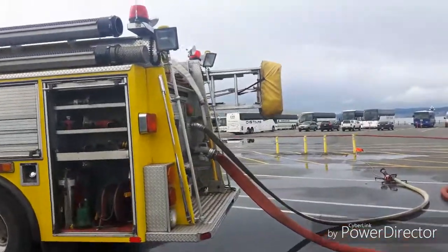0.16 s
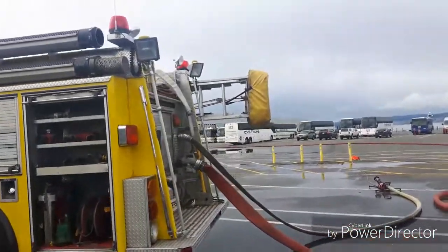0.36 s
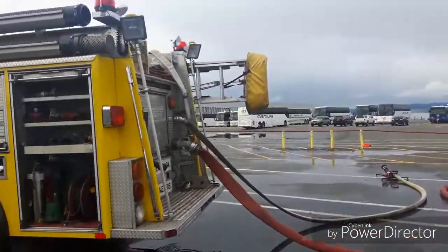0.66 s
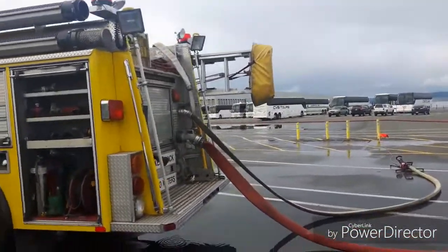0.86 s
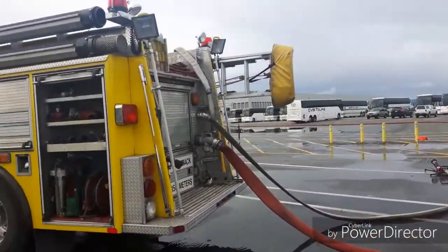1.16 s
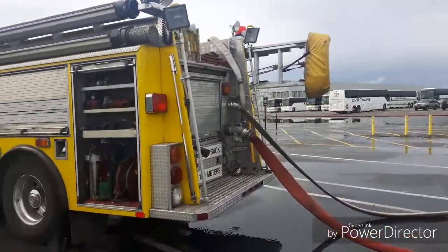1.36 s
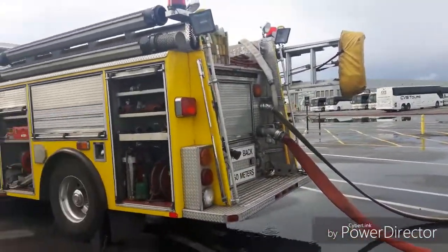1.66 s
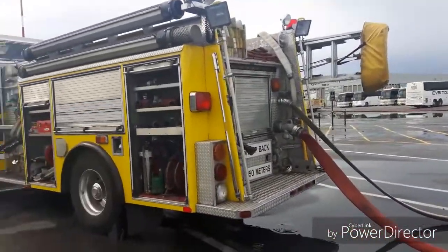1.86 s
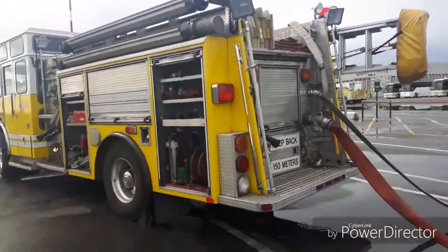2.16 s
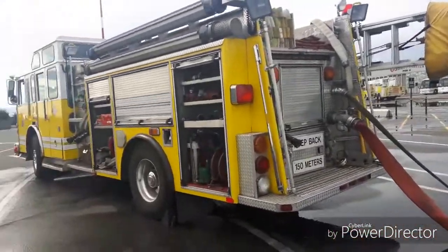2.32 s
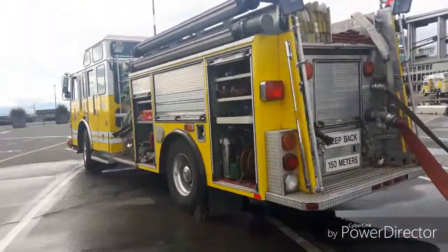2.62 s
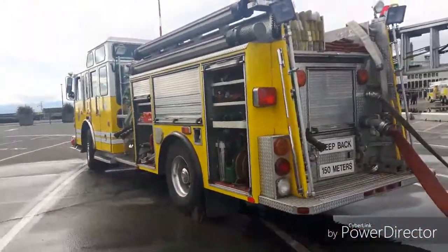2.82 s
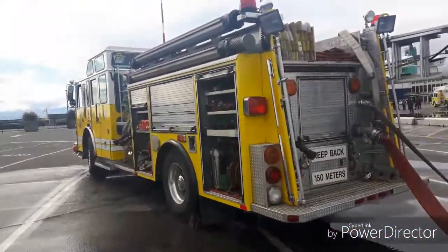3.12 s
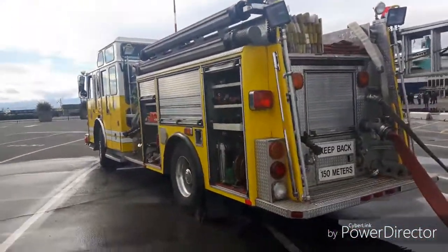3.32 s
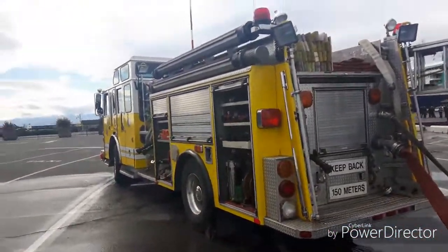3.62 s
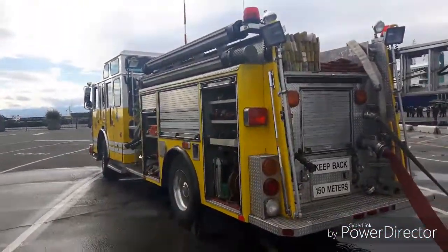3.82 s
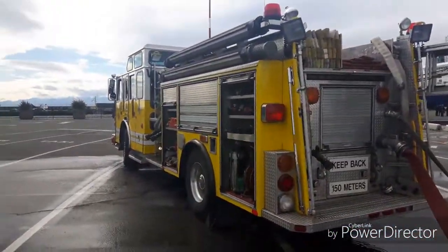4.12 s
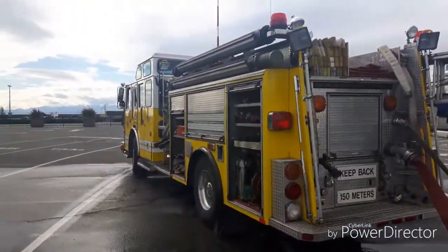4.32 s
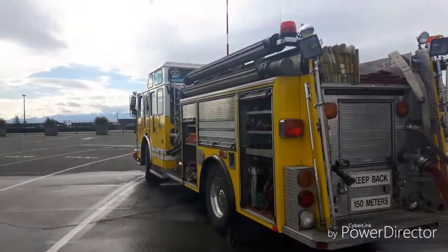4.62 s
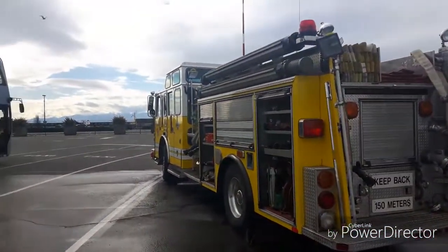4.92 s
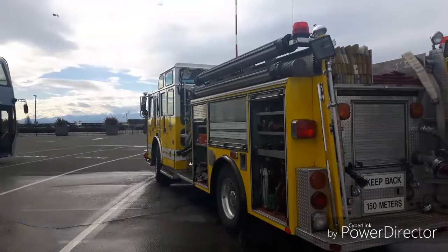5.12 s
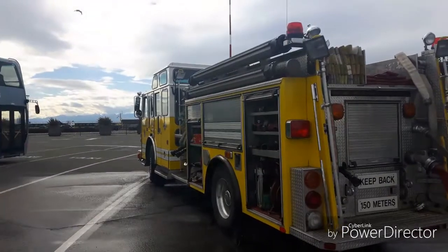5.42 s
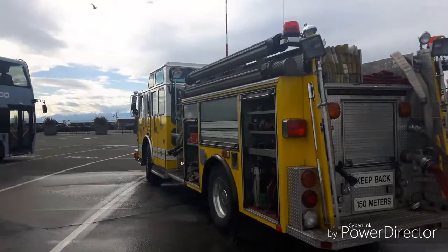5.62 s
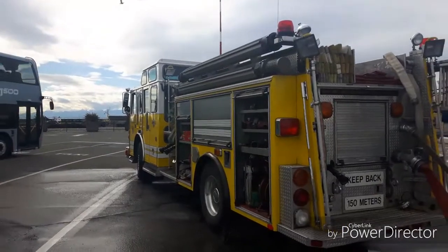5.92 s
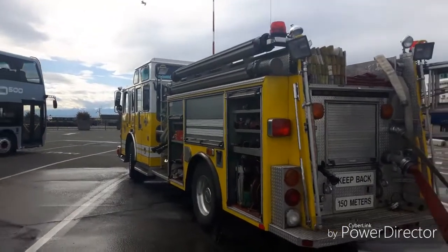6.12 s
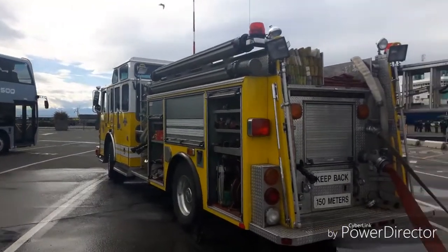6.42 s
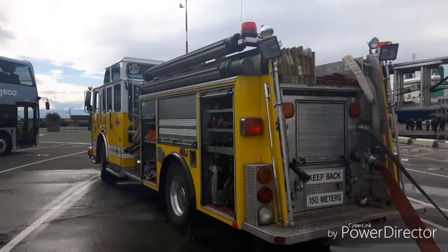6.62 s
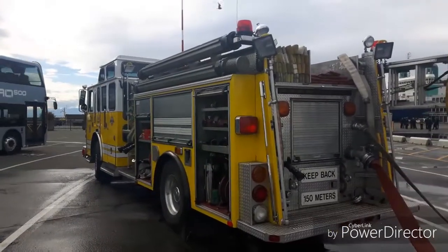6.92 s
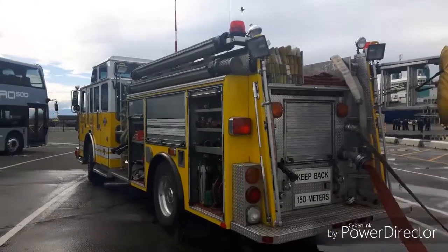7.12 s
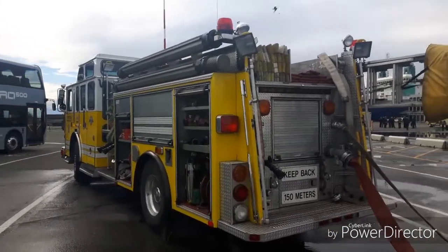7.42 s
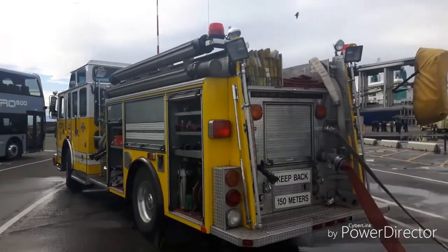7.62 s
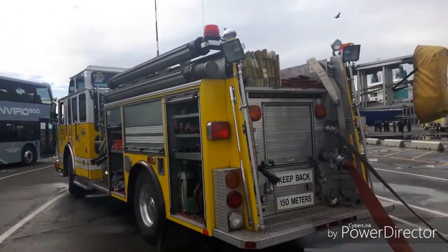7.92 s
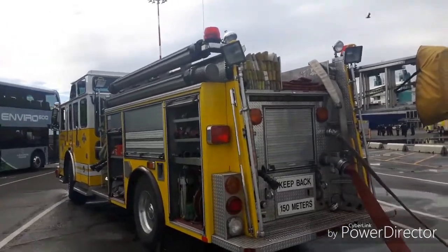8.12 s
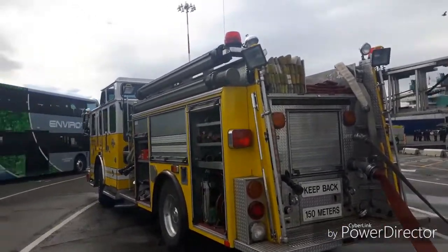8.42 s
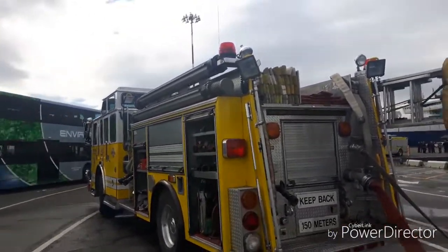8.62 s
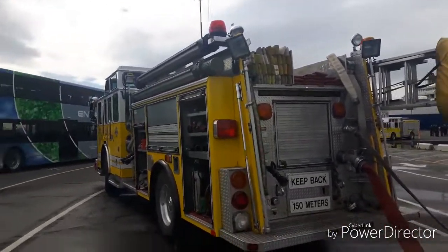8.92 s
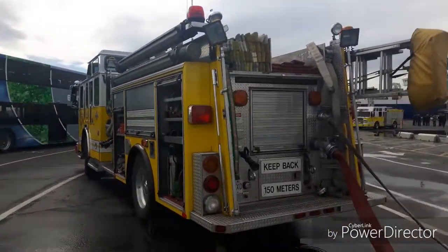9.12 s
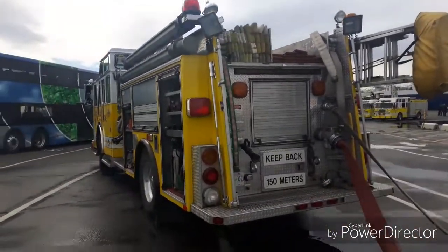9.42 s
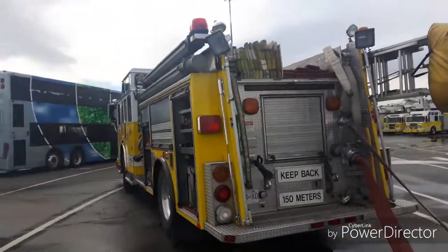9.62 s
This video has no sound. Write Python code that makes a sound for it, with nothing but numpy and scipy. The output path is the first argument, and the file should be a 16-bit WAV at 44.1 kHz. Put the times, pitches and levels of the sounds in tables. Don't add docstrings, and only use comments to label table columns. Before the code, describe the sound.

From 0 s a large six-cylinder diesel runs close by in an open yard, driving a pump: a thick low roar with rapid firing pulses, exhaust hum and mid-pitched gear tones. Its speed wavers only slightly, and individual tones swell and fade as the handheld microphone walks around the tail. Fine air and water hiss and a very faint high turbo whistle lie above. Around 1.5-2.5 s the clatter dulls, then opens brighter by 3.5 s. From 3 to 7 s come tiny gritty ticks, loose rattles and wet steps, with the sharpest click and splash near 4.1 s. A creeping bus adds a faint gear note from about 2.5 to 8.5 s, rising late. After 5 s the watery spray fades and the upper sound changes colour. From 9 s wind slaps and low pops buffet the microphone, strongest near 9.6 s, while the engine speeds up slightly until the end at about 9.8 s.

```python
import sys
import numpy as np
from scipy import signal
from scipy.fft import rfft, irfft
from scipy.io import wavfile
from scipy.ndimage import uniform_filter1d

SR = 44100
rng = np.random.default_rng(int(sys.argv[2]) if len(sys.argv) > 2 else 0)


def pcm_store(signal):
    levels = np.round(np.clip(np.atleast_2d(signal), -1, 1) * 32767)
    wavfile.write(sys.argv[1], SR, levels.astype(np.int16).T)


def to_linear_factor(level_db):
    exponent = np.asarray(level_db, float) / 20
    return 10 ** exponent


N = 430416
TIME = np.arange(N) / SR
HZ = np.maximum(np.fft.rfftfreq(N, 1 / SR), 1)
COARSE = 10


def in_time(rows, t=TIME):
    s, *columns = np.transpose(rows)
    return [np.interp(t, s, column) for column in columns]


def at_hz(points, hz):
    point_hz, value = np.array(points)[:, 0], np.array(points)[:, 1]
    return np.interp(np.log(hz), np.log(point_hz), value)


def swell(s, half_s, t=TIME):
    return np.exp(-((t - s) / half_s) ** 2)


def rounded(x, seconds, t=TIME):
    return uniform_filter1d(x, size=round(seconds / t[1]), mode="nearest")


def drift(rate, t=TIME):
    knots = rng.standard_normal(1000)
    return np.interp(t * rate * 2, np.arange(1000), 1.2 * knots)


def coloured(spectrum):
    x = irfft(rfft(rng.standard_normal(N)) * to_linear_factor(at_hz(spectrum, HZ)), N)
    return x / x.std()


def filtered(x, order, hz, kind):
    return signal.sosfilt(signal.butter(order, hz, kind, fs=SR, output="sos"), x)


def resonance(x, hz, width_hz):
    r = np.exp(-np.pi * width_hz / SR)
    poles = [1, -2 * r * np.cos(2 * np.pi * hz / SR), r * r]
    return signal.lfilter([(1 - r * r) / 2, 0, (r * r - 1) / 2], poles, x)


def noise_band(hz, width_hz):
    band = resonance(resonance(rng.standard_normal(N), hz, width_hz), hz, width_hz)
    return band / band.std()


def tone(angle, level_db, fade_db, t, rate):
    wander = .5 * fade_db / 4 * drift(rate, t)
    level = np.sqrt(2) * to_linear_factor(level_db + fade_db * drift(rate, t))
    return level * np.sin(angle + wander + rng.uniform(0, 7.02))


def spot_gains(spots, who, t):
    return [to_linear_factor(db) * swell(s, half_s, t) for name, s, half_s, db in spots if name == who]


# time in seconds, pitch in Hz, level in dB rms.
BUS_NOTE = [(2.3, 548, -62), (2.7, 555, -42), (3.3, 559, -42), (3.95, 561, -46), (4.2, 561, -57),
            (4.8, 556, -50), (6.2, 560, -48), (6.7, 566, -60), (7.7, 586, -56), (8, 592, -47),
            (8.4, 606, -50), (8.7, 612, -62)]


def bus():
    hz, db = in_time(BUS_NOTE)
    gear = tone(2 * np.pi * np.cumsum(hz) / SR, db, 1.7, TIME, 5.0)
    fan = to_linear_factor(-50) * swell(9.4, .55) * noise_band(2640, 400)
    return gear + fan


# time in seconds, half-length in seconds, level in dB rms.
GUSTS = [
    (0.502, 0.75, -42.5),
    (2, 1.2, -46),
    (3.153, 0.6, -39.5),
    (7.6, 1.5, -50.5),
    (9.005, 0.028, -32),
    (9.2, .2, -37),
    (9.4, 0.13, -35),
    (9.65, 0.07, -33),
    (9.744, .04, -37),
]
# time in seconds, peak in dB, sharpness as a share of the hump.
POPS = [(9.1164, -10.5, .35), (9.1258, -8.5, .2), (9.1336, -13, .6), (9.3335, -12.5, .1), (9.369, -14, .3),
        (9.379, -16, .3), (9.3925, -13, .4), (9.4115, -14, .2), (9.592, -5, .5), (9.616, -16, .2),
        (9.632, -15.5, .1), (9.644, -18, 0), (9.66, -18, .1), (9.7395, -14.5, 0)]


def wind():
    calm_db = -56
    blow = to_linear_factor(calm_db) + sum(to_linear_factor(db) * swell(s, half_s) for s, half_s, db in GUSTS)
    lumps = blow * to_linear_factor(2.5 * drift(20))
    lumps = lumps * coloured([(20, -39.5), (60, -2.0), (120, -3.0), (220, -11.0), (500, -33.0), (2000, -82.0)])

    kicks = np.zeros((2, N))
    for s, db, sharp in POPS:
        kicks[:, round(s * SR)] = to_linear_factor(db), sharp * to_linear_factor(db)
    t = np.arange(-200, 1200) / SR
    swing = np.cos(2 * np.pi * 152 * t) * np.exp(-np.where(t < 0, -t / .0032, t / .006))
    edge = np.cos(2 * np.pi * 290 * t) * np.exp(-(t / .0014) ** 2)
    pops = signal.oaconvolve(kicks, [.66 * swing, edge], axes=1).sum(0)

    port = signal.butter(2, [40, 1300], "band", fs=SR, output="sos")
    return signal.sosfiltfilt(port, lumps + 1.05 * pops[150:N + 150])


# time in seconds, peak in dB, pitch in
# Hz.
GRIT = [(3.336, -28, 2000), (3.401, -26, 2000), (3.489, -28, 1900), (3.541, -25.5, 1600), (3.66, -29, 1900),
        (3.829, -30, 1500), (4.051, -27, 1500), (4.083, -17.5, 1500), (4.095, -25, 1400),
        (4.108, -27, 1500), (4.135, -28, 2600), (4.160, -24.5, 1450), (4.178, -29, 2800),
        (4.364, -30, 1700), (4.659, -25, 3000), (4.756, -28, 2000), (5.008, -23.5, 2800), (5.33, -29, 3200),
        (5.385, -30, 3200), (5.534, -24.5, 3300), (5.605, -29, 3200), (5.676, -29, 3000),
        (5.846, -33, 3400), (6.120, -24, 3200), (6.291, -29, 3300), (6.808, -28, 3300),
        (3.224, -32, 1400), (3.2996, -31, 1400), (3.375, -30, 1900), (3.505, -29, 2000),
          (3.619, -33, 1300), (3.7805, -29, 1300), (3.803, -30, 1250), (4.035, -32, 1300),
          (4.12, -30, 1400), (4.6345, -34, 3040), (4.891, -35, 3120), (5.179, -34, 2860),
          (5.342, -31, 3200), (5.3635, -35, 3500), (5.593, -31, 3500), (5.634, -33, 3360),
          (5.81, -34, 3040), (5.918, -34, 3160), (6.022, -34, 3380), (6.04, -34, 3100), (6.078, -33, 3200),
          (6.155, -32, 3100), (6.346, -34, 3400), (6.385, -35, 3400), (6.613, -33, 3300), (6.70, -33, 3100),
          (6.938, -34, 3400), (7.013, -34, 3270)]
# time in seconds, peak in dB.
CRACKLES = [(0.1062, -62), (0.201, -63), (0.2968, -55), (0.668, -55), (0.8974, -61.5), (1.4587, -59.5),
            (2.795, -58.5), (2.8423, -55.5), (3.019, -59), (4.039, -57.5), (5.146, -57), (6.66, -65),
            (6.7835, -59.5), (6.838, -63), (7.193, -62), (7.752, -59), (7.8785, -61.5), (8.284, -58.5),
            (9.161, -57), (9.4336, -61.5)]


def ticks():
    out, t = np.zeros(N + 1500), np.arange(1500) / SR
    for s, db, hz in GRIT:
        burst = rng.standard_normal(1500) * np.exp(-t / 0.0041)
        ring = filtered(burst, 4, [.76 * hz, min(1.4 * hz, 3900)], "band")
        out[round(s * SR):][:1500] += to_linear_factor(db - 0.5) * ring / abs(ring).max()
    for s, db in CRACKLES:
        burst = rng.standard_normal(300) * np.exp(-t[:300] / .0012)
        burst = np.diff(burst, 2)
        out[round(s * SR):][:298] += to_linear_factor(db + 4.0) * burst / abs(burst).max()
    return out[:N]


# time in seconds, half-length in seconds, level in dB rms.
STEPS = [
    (2.9, 0.15, -48),
    (3.45, 0.14, -45),
    (4.103, 0.15, -42),
    (4.731, .05, -50),
    (6.066, 0.05, -52),
    (6.828, .04, -43),
]


def stirred():
    return sum(to_linear_factor(db) * swell(s, half_s) for s, half_s, db in STEPS)


def splashes():
    drops_per_s = 1100
    falls = rng.random(N) < drops_per_s / SR
    size = to_linear_factor(3.8 * rng.exponential(1, N).clip(0, 5))
    drops = falls * size * rng.choice([-1, 1], N)
    drops = filtered(drops, 2, (1220, 3730), "band")
    drops = filtered(drops, 8, 4200, "low")
    return stirred() * drops / drops.std()


# frequency in Hz, density in dB per Hz.
SPRAY_COLOUR = [(3500, -11), (4600, 2), (5500, 0), (6300, -3.5), (7000, -17), (8000, -51)]


def spray():
    base_db, sight_db, gone_s, fade_s, stirred_db = -81.5, 11.5, 5.3, .2, -30.5
    sight = in_time(WALK)[0]
    level = to_linear_factor(base_db + sight_db * sight) + to_linear_factor(stirred_db) * stirred()
    level = level / (1 + np.exp((TIME - gone_s) / fade_s))
    return level * to_linear_factor(1.2 * drift(17)) * coloured(SPRAY_COLOUR)


# frequency in Hz, density in dB per Hz.
AIR_COLOUR = [(4000, -5.5), (6800, -1.5), (7900, -2.5), (8300, -4.5), (8800, -4), (11000, -5.5),
              (13000, -3.5), (15400, -2)]


def air_hiss():
    base_db, hidden_db, rise_db_per_s, rise_from_s = -73, -3.5, 0.8, 5.0
    hidden = rounded(1. * (TIME > 1.5) * (TIME < 2.75), .2)
    air_db = base_db + hidden_db * hidden + rise_db_per_s * np.maximum(TIME - rise_from_s, 0)
    flicker_db = .6 * drift(12) + .1 * drift(45)
    pulse = 1 + .2 * np.cos(crank())
    air = to_linear_factor(air_db + flicker_db) * pulse * coloured(AIR_COLOUR)
    leak = to_linear_factor(-78.5 + 1.5 * drift(9)) * swell(10, 2.4) * noise_band(6800, 1202)
    return air + leak


# time in seconds, pitch in Hz, level in dB rms.
TURBO_WHISTLE = [(0, 13290, -90), (1.25, 13110, -83), (2.1, 13020, -100), (2.6, 13050, -92),
                 (3.37, 13500, -87), (4.1, 13250, -90), (4.65, 13310, -86), (5.2, 13040, -85),
                 (5.8, 12640, -83), (6.4, 12980, -82), (7.15, 13160, -78), (8.35, 12670, -78),
                 (9.0, 12830, -79), (9.76, 13480, -87)]


def turbo():
    hz, db = in_time(TURBO_WHISTLE)
    angle = 2 * np.pi * np.cumsum(rounded(hz, .4) + 40 * drift(45)) / SR
    flutter = signal.lfilter([1], [1, -.995], rng.standard_normal(N))
    lower = to_linear_factor(-8) * flutter / flutter.std() * np.sin(angle * 7 / 11)
    return to_linear_factor(db + 2.5 + 1.8 * drift(10)) * (1 + .45 * drift(50)) * (np.sin(angle) + lower)


# time in seconds, engine speed in firings per second.
SPEED = [(0, 53.4), (1.25, 52.45), (1.8, 52.05), (2.2, 51.8), (2.6, 53.15), (3.15, 53.6), (3.5, 53.1),
         (4.05, 52.3), (4.5, 53.2), (4.9, 51.25), (5.55, 50.98), (6, 52.15), (6.85, 53.25), (7.25, 52.95),
         (8.1, 53.3), (9.15, 53.87), (9.6, 56.8), (9.76, 57.4)]


def crank(t=TIME):
    flywheel_s = .2
    return 2 * np.pi * np.cumsum(rounded(in_time(SPEED, t)[0], flywheel_s, t)) * t[1]


RATIOS = {"pipe low": 2, "pipe": 3, "manifold": 17 / 3, "pipe high": 6, "casing": 7.5, "pump gear": 12.31,
          "timing gear": 14, "upper gear": 17, "whine": 2 * 12.31, "idler": 35.1, "pump gear third": 3 *
          12.31, "fan": 39.75, "alternator": 56.8}
QUIET_DB = {"pipe low": -46.5, "pipe": -46, "manifold": -47, "pipe high": -54, "casing": -56.5, "pump gear":
            -54, "timing gear": -54, "upper gear": -58}
# tone name, time in seconds,
# half-length in seconds, level in dB rms.
TONE_SPOTS = [("pipe low", 3.5, .8, -43), ("pipe low", 4.4, .3, -45), ("pipe low", 8.4, .5, -45),
              ("pipe low", 9.55, .15, -42), ("pipe", 1.95, .35, -40), ("pipe", 3.25, .25, -45),
              ("pipe", 5.2, .7, -41), ("pipe", 6.8, .35, -42), ("pipe", 7.8, .7, -45),
              ("pipe", 9.4, .2, -44), ("pipe low", 6.5, 1.0, -52), ("manifold", .3, .5, -42),
              ("manifold", 2.9, .8, -43), ("manifold", 5.4, .4, -43), ("manifold", 6.9, 1.0, -40),
              ("manifold", 1.8, .4, -44), ("manifold", 8.9, .3, -43), ("manifold", 9.5, .3, -35),
              ("pipe high", 2.5, .35, -42), ("pipe high", 4.0, .7, -43), ("pipe high", 6.4, .8, -39),
              ("pipe high", 7.8, .3, -42), ("pipe high", 9.5, .35, -40), ("casing", 2.0, .3, -47),
              ("casing", 4.4, .7, -46), ("casing", 6.4, .9, -41), ("casing", 8.2, .5, -44),
              ("pump gear", 9.68, .15, -48), ("pump gear", 3.55, .3, -50), ("pump gear", .25, .25, -48),
              ("pump gear", 2.75, 1.1, -42.5), ("pump gear", 6.5, .8, -51), ("pump gear", 4.4, .25, -50),
              ("pump gear", 9.1, .25, -45), ("timing gear", .6, .55, -38.5),
              ("timing gear", 3.6, 1.0, -39.5), ("timing gear", 5.05, .4, -40.5),
              ("timing gear", 7.15, .85, -41), ("timing gear", 8.9, .4, -42),
              ("timing gear", 7.95, .2, -49), ("timing gear", 4.45, .3, -48), ("pump gear", 8.5, .4, -53),
              ("pump gear", 5.5, .4, -53), ("upper gear", 6.7, .3, -55), ("upper gear", 7.5, .7, -48),
              ("upper gear", 8.3, .25, -54), ("timing gear", 6.0, .35, -44), ("upper gear", 6.2, .5, -54),
              ("whine", 9.48, .22, -45), ("idler", 9.1, .35, -54), ("pump gear third", 7.6, .6, -59),
               ("fan", 8.0, .5, -61), ("fan", 8.85, .25, -55), ("alternator", 9.12, .2, -57),
               ("pump gear third", 2.2, .15, -61)]


def gears():
    step = COARSE // 2
    t, out = TIME[::step], 0
    angle = crank(t)
    for name, ratio in RATIOS.items():
        level = to_linear_factor(QUIET_DB.get(name, -75)) + sum(spot_gains(TONE_SPOTS, name, t))
        out = out + level * tone(ratio * angle, 0, 1.3, t, 7.0)
    return signal.resample_poly(out, step, 1)[:N]


# frequency in Hz, density in dB per Hz.
ROAR_COLOUR = [(20, -49), (45, -13.5), (100, -6), (160, -1.5), (260, -5.5), (310, -3), (430, -7),
               (490, -12), (620, -10), (1100, -17), (2400, -23.5), (3400, -22.5), (4200, -30),
               (5200, -43.5), (6300, -49.5), (7000, -75)]


def roar():
    level_db, knock_hz = -32, 1400
    x, angle = coloured(ROAR_COLOUR), crank()
    upper = signal.sosfiltfilt(signal.butter(2, knock_hz, "high", fs=SR, output="sos"), x)
    burst = 1 + 0.12 * np.cos(angle) + 0.081 * np.cos(angle / 2) + 0.035 * np.cos(angle / 6)
    uneven = to_linear_factor(-0.5 * drift(25))
    return to_linear_factor(level_db) * (x + upper * (burst * uneven - 1))


# multiple of the engine cycle, level in dB rms.
STRONG_ORDERS = [(13, -51), (14, -42.5), (15, -52.5), (19, -50), (20, -50), (35, -48), (37, -43.5),
                 (40, -48), (44, -55.5), (46, -50.5)]
# frequency in Hz, level of each order in dB rms.
WEAK_ORDERS = [(40, -79.5), (90, -63), (300, -67.5), (500, -57.5), (800, -68.5), (1100, -58), (1500, -72.5),
               (2100, -85.5)]
# multiple of the cycle, time in seconds, half-length in
# seconds, level in dB rms.
ORDER_SPOTS = [(21, 1.2, .4, -49), (21, 5.2, 1.2, -45), (21, 8.5, 1, -50), (22, 5.4, .6, -48),
               (22, 8, 1.5, -45), (24, 1.1, .35, -41), (24, 2.2, .35, -40), (24, 4.2, .55, -41),
               (24, 5.8, .7, -46), (24, 7.3, .6, -47), (27, 2.3, .4, -47), (27, 4.3, .7, -49),
               (27, 5.9, .35, -46), (30, 2.1, .5, -49), (30, 7.5, 1, -47), (32, 4.2, .6, -50),
               (32, 6, .6, -44), (32, 7.9, .9, -44), (33, 3, .3, -41), (33, 4.2, .4, -47), (33, 7, .6, -43),
               (33, 8.8, .5, -45), (38, .6, .25, -48), (38, 2.9, .35, -44), (38, 4.5, .8, -41.5),
               (38, 6.2, .8, -46), (39, 1.1, .35, -45), (39, 1.8, .3, -41), (39, 3.7, .6, -46),
               (39, 5, .35, -38), (39, 5.75, .3, -43), (39, 8.2, .8, -47), (42, 8.1, .7, -48),
               (48, 1.6, .4, -48), (48, 4.6, .6, -48), (48, 6.7, .4, -47), (48, 8.5, .5, -44),
               (51, 2.15, .25, -43), (51, 4.6, .6, -45), (56, 9.3, .3, -46), (59, 9.5, .25, -46),
               (62, 9.2, .3, -47), (68, 3.3, .6, -48),
               (17, 1.9, .5, -46), (17, 4.25, .25, -47), (17, 5.25, .25, -47), (17, 6.8, .8, -53),
               (17, 9.3, .3, -46), (24, 7.75, .25, -47), (24, .4, .4, -47), (38, 1.7, .6, -50),
               (52, 5.5, .4, -47), (65, .1, .3, -48), (68, 1.7, .5, -53), (68, 8.3, .4, -51),
               (81, .5, .6, -52), (81, 2, .4, -53), (81, 3.7, .8, -51), (82, .6, .5, -54),
               (82, 3.6, .6, -49), (82, 7.6, .8, -52), (90, 5.6, .8, -58), (96, 3.2, .4, -58),
               (96, 5.7, .5, -56), (96, 7.9, .6, -55), (111, 3.9, .5, -57), (114, 3.2, .3, -60),
               (120, 1, .5, -55), (120, 2.8, .5, -55), (120, 8.2, .4, -55), (122, 3.2, .4, -55),
               (122, 8.2, .3, -61), (124, 3.1, .4, -55), (124, 8.2, .3, -58), (126, 5.2, .5, -53),
               (126, 6.3, .4, -55), (129, 9.4, .3, -58), (130, .8, .4, -56), (135, 5.2, .5, -57)]


def exhaust():
    between_spots_db = -58
    t, out = TIME[::COARSE], 0
    cycle, strong = crank(t) / 6, dict(STRONG_ORDERS)
    for k in set(range(4, 185)) - {12, 18, 34, 36, 45, 84, 102}:
        spots = spot_gains(ORDER_SPOTS, k, t)
        if spots:
            out = out + (to_linear_factor(between_spots_db) + sum(spots)) * tone(k * cycle, 0, 1.7, t, 5.0)
            continue
        if k in strong:
            level_db = strong[k] - 4.9
        else:
            level_db = at_hz(WEAK_ORDERS, 9.12 * k) - rng.standard_normal()
            level_db += 4.4 * (k % 6 == 0) + 0.5 * (k % 2 == 0)
        out = out + tone(k * cycle, level_db, 3.7, t, 2.2)
    return signal.resample_poly(out, COARSE, 1)[:N]


# time in seconds, sight of the engine side from 0 to 1, nearness in dB.
WALK = [(0, .35, 0.5), (1.1, 0.63, -0.5), (1.7, 0.12, 1), (2.3, 0.3, 1.5), (2.9, 0.7, 1.5), (3.6, 1, 1),
        (4.9, 0.87, 2.5), (6.5, 0.81, 2), (7.9, 0.55, 1.5), (8.6, 0.72, 1.5), (9.3, 0.93, 1.5),
        (9.76, 0.91, 3)]
# time in seconds, depth of the turn (about 0 to 1).
GRIP = [(0, 0.05), (3.9, 0.26), (4.7, 0.8), (5.6, 0.95), (9.76, 1.09)]


def shaded(x):
    # centre, dB from full sight, dB from the turned grip, share of nearness
    band_hz, sight_db = (130, 600, 2600, 5000), (-1.5, 1, 8.5, 4)
    turn_db, near_share = (-1.5, -1, -1.1, 15), (1.9, 0.98, .3, .3)
    spectrum, out, turn = rfft(x), 0, in_time(GRIP)[0]
    sight, near_db = in_time(WALK)
    for k in range(4):
        share = at_hz(list(zip(band_hz, np.eye(4)[k])), HZ)
        db = sight_db[k] * sight + turn_db[k] * turn + near_share[k] * near_db
        out = out + irfft(spectrum * share, N) * to_linear_factor(db - db.mean() + 0.67 * drift(7))
    return out


# centre in Hz, width in Hz, share removed before the turn,
# share after (negative adds).
GRIP_NOTCHES = [(2350, 440, 0.01, 0.16), (2800, 2000, 0.26, 0.0092), (3970, 300, 0.01, 0.99),
                (4470, 495, 0.19, 1), (6230, 1200, 0.01, 0.78), (2910, 87, 0.01, 0.0033),
                (4200, 130, 0.01, -0.25)]
# centre in Hz, width in Hz, share removed (negative adds).
LOCKERS = [(2960, 570, 0.32), (3640, 640, -0.28), (2060, 340, 0.0093), (1070, 220, -0.12),
           (1350, 250, 0.06)]


def notched(x):
    turn = in_time(GRIP)[0]
    for hz, width_hz, before, after in GRIP_NOTCHES + GRIP_NOTCHES:
        share = np.clip(before + turn * (after - before), -.4, .66)
        x = x - share * resonance(x, hz, width_hz)
    beside = swell(.9, 1.1)
    for hz, width_hz, share in LOCKERS + LOCKERS:
        x = x - share * beside * resonance(x, hz, width_hz)
    return x


def scene():
    engine = shaded(exhaust() + roar()) + gears() + bus()
    around = notched(engine + ticks() + splashes())
    return (around + turbo() + air_hiss() + spray() + wind())[None]


def low_pass(x):
    return signal.sosfilt(signal.butter(12, 15480, fs=SR, output="sos"), x)


def record(dry):
    return low_pass(dry)


dry = scene()
out = record(dry)
pcm_store(out)
```